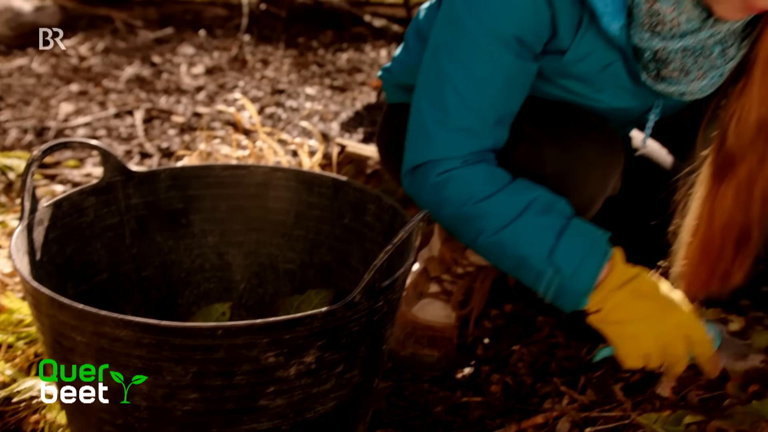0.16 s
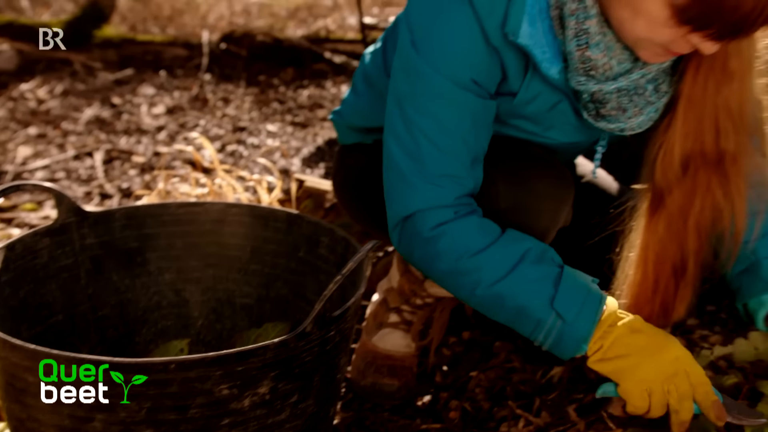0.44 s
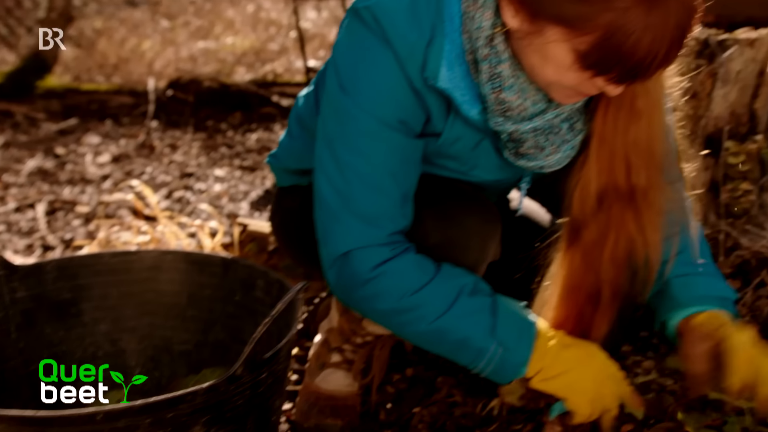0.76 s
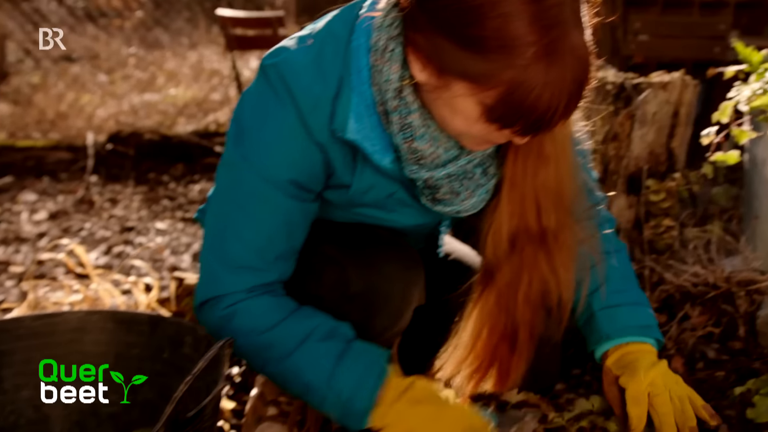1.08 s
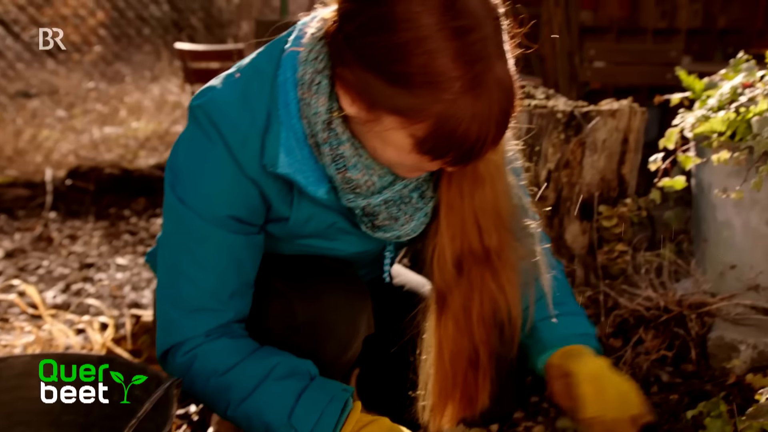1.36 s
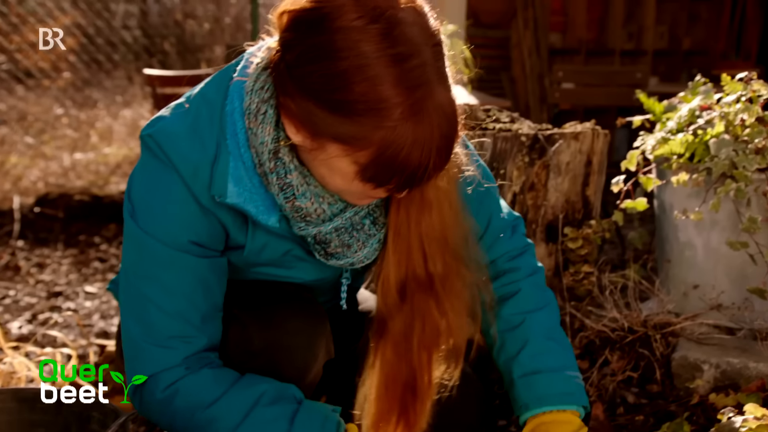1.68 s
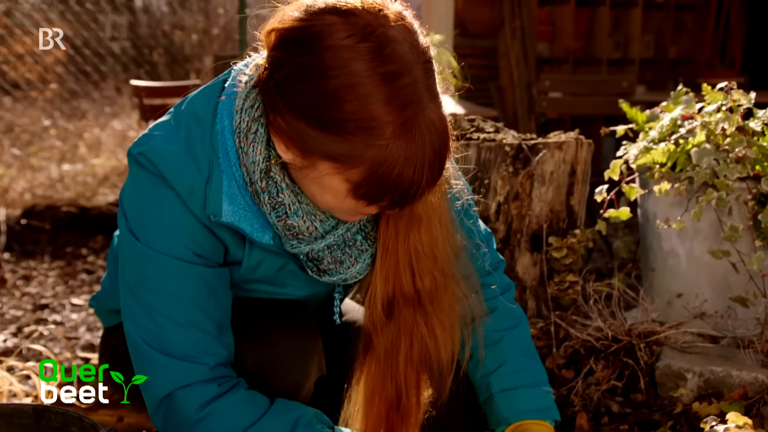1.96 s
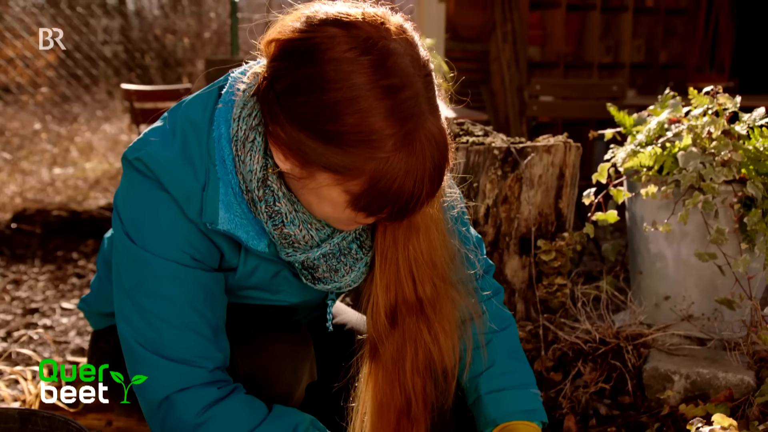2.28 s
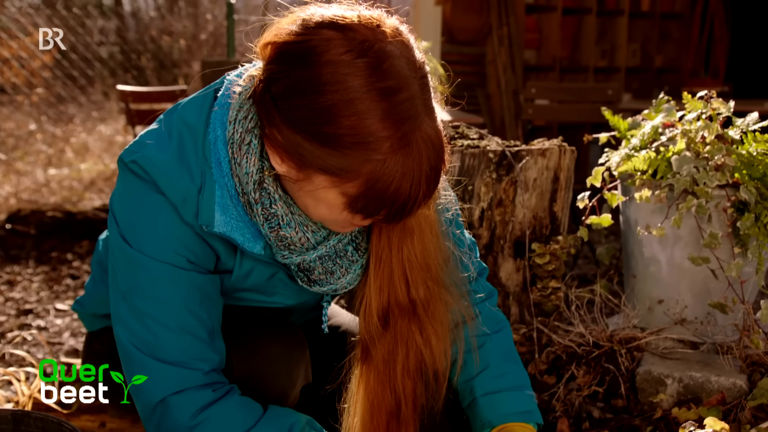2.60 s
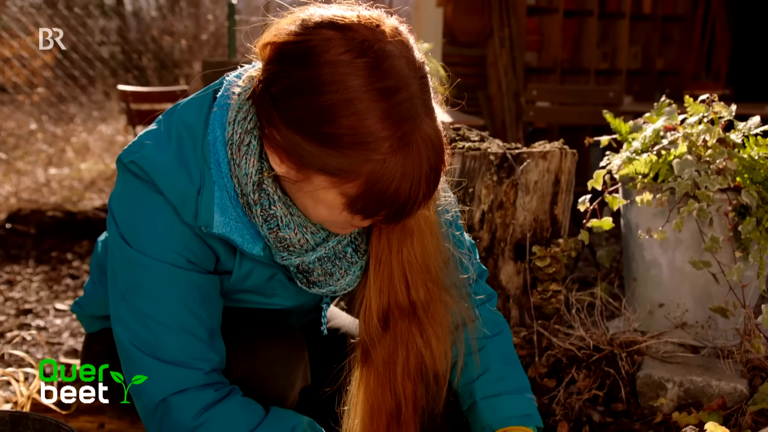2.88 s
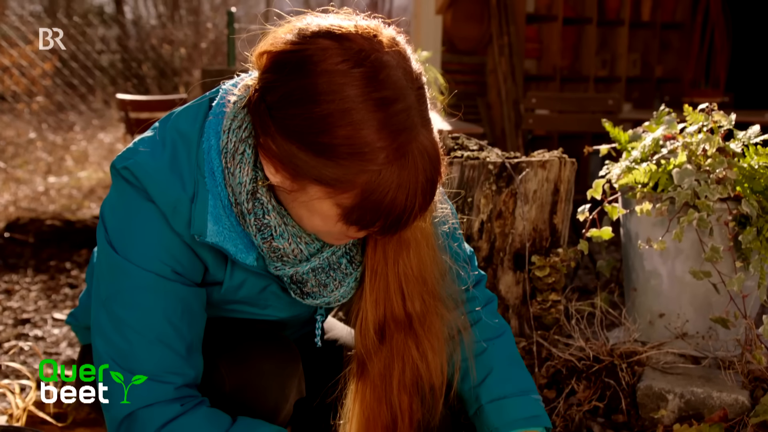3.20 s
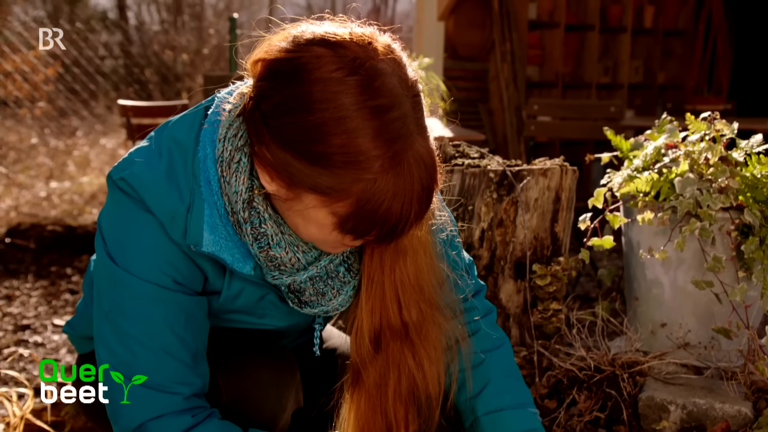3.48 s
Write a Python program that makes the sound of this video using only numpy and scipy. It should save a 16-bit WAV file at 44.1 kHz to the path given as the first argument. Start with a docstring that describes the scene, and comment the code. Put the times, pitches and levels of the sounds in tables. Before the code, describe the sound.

Dry leaves rustle and crinkle under gloved hands, with small snaps and one shear snip.

```python
"""A garden bed, the microphone close to gloved hands rummaging through dry, leathery leaves.
For two seconds the leaves slide and crinkle in several strokes, while stalks tick and snap.
The hands go quieter; at three seconds the shears bite through one stem and the rustling picks up.
A low outdoor rumble and a faint hiss lie behind it throughout."""
import sys
import numpy as np
from scipy import signal
from scipy.fft import rfft, irfft, next_fast_len
from scipy.io import wavfile

SR = 44100
rng = np.random.default_rng(int(sys.argv[2]) if len(sys.argv) > 2 else 0)


def store_pcm(level_fs):
    """Save levels as 16-bit WAV."""
    pcm = np.round(np.clip(level_fs, -1, 1) * 32767).astype(np.int16)
    wavfile.write(sys.argv[1], SR, np.atleast_2d(pcm).T)


N = 160965
BAND_EDGE_HZ = 14400

# Stereo width of the treble hiss: f/Hz, gain of the side signal/dB
WIDTH = [(2500, -65), (3800, -44), (5000, -14.5), (8000, -3), (14000, -4)]


def rustle():
    """Close up, leaves crinkle and slide over the duller rub of gloves and stalks; gives middle, side."""
    # Strokes of the hands in the foliage: t/s, leaf level/dB, rubbing level/dB
    strokes = [(0, -70, -50.5), (.07, -61.5, -61.5), (.12, -52.5, -55), (.18, -43, -55.5), (.235, -48, -51),
               (.285, -49, -63), (.38, -45, -56.5), (.42, -51, -54), (.452, -46.5, -49.5),
               (.475, -57, -59.5), (.52, -57, -57.5), (.565, -49.5, -59), (.635, -55.5, -57),
               (.67, -46, -49.5), (.73, -55.5, -59), (.80, -49, -60), (.835, -58.5, -62), (.88, -52.5, -61),
               (.94, -57, -59), (.985, -43, -51.5), (1.03, -48.5, -57), (1.09, -50.5, -54),
               (1.16, -43.5, -54), (1.19, -53, -57), (1.25, -53.5, -53), (1.335, -56.5, -62),
               (1.405, -56, -63), (1.43, -69, -89), (1.55, -71, -70), (1.587, -64, -59),
               (1.605, -50, -51.5), (1.69, -53.5, -58.5), (1.80, -50.5, -58), (1.88, -57, -57.5),
               (1.97, -57, -64), (2.0, -65.5, -65.5), (2.14, -66, -69), (2.24, -63.5, -72),
               (2.37, -65.5, -74), (2.42, -59, -66), (2.53, -67.5, -68), (2.61, -68, -76),
               (2.66, -73, -66.5), (2.70, -61.5, -68), (2.79, -76, -85), (2.92, -68, -81), (2.97, -55, -66),
               (3.02, -57.5, -69), (3.075, -54.5, -57), (3.16, -53, -67), (3.215, -52, -57),
               (3.27, -54, -64), (3.34, -53.5, -59), (3.365, -51, -60), (3.39, -52, -63.5),
               (3.438, -49, -57.5), (3.47, -66, -80), (3.53, -58.5, -64.5), (3.65, -61, -70)]
    # Spectrum of the dry leaves: f/Hz, relative level/dB
    leaf_colour = [(150, -10.5), (400, -5), (900, -1.5), (1800, 0), (3000, 1.5), (4500, 1), (6500, -0.5),
                   (8500, -3.5), (11000, -5.5), (14500, -10.5)]
    # Spectrum of gloves and stalks rubbing: f/Hz, relative level/dB
    rub_colour = [(60, -24), (150, -9), (300, 0.5), (600, -1.5), (1000, 0.5), (1400, 0), (2200, -12),
                  (5000, -17), (12000, -33)]
    t = np.arange(N) / SR
    stroke_s, leaf_db, rub_db = np.transpose(strokes)
    leaf_gain = amp(np.interp(t, stroke_s, leaf_db))
    rub_gain = amp(np.interp(t, stroke_s, rub_db))
    catch = catching()
    crinkling = amp(-2.5) * crinkles()
    sliding = amp(-2) * rng.standard_normal(N)
    leaves = leaf_gain * catch * unit_rms(coloured(crinkling + sliding, leaf_colour))
    rub = rub_gain * catch * unit_rms(coloured(crinkles(), rub_colour))
    side_noise = unit_rms(coloured(rng.standard_normal(N), leaf_colour))
    return leaves + rub, leaf_gain * coloured(side_noise, WIDTH)


def crinkles(patches=32, per_s=2600, spread_db=4, decay_s=.0005):
    """Tiny buckles of uneven size, each ringing one of many patches of leaf for an instant."""
    size_db = spread_db * np.minimum(rng.exponential(1, N), 4.17)
    sizes = amp(size_db) * rng.choice([-1, 1], N)
    clicks = sizes * (rng.random(N) < per_s / SR)
    patch = rng.integers(0, patches, N)
    t = np.arange(256) / SR
    rings = rng.standard_normal((patches, len(t))) * np.exp(-t / decay_s)
    out = np.zeros(N)
    for k, ring in enumerate(rings):
        out += signal.oaconvolve(clicks * (patch == k), unit_rms(ring))[:N]
    return unit_rms(out)


def catching(grip_s=.009, depth_db=2.2):
    """The leaves catch and let go: a gain with quick random swells."""
    window = np.hanning(int(2 * grip_s * SR))
    swell = unit_rms(signal.oaconvolve(rng.standard_normal(N), window, "same"))
    return unit_rms(amp(depth_db * swell))


def snaps(peak_db=8, peak_octaves=.31):
    """Each stalk or leaf rib breaks with a resonance of its own."""
    # Stalks and ribs breaking: t/s, level/dB, decay/s, resonance f/Hz, tilt/(dB per octave)
    breaks = [(0.2285, -38, .002, 5000, -2), (0.2486, -35, 0.0006, 7000, 2), (.262, -39.5, 0.0013, 4520, 1),
              (.3897, -41, 0.00054, 4000, -3), (.4475, -43, .002, 4500, 6), (.528, -44.5, .002, 6000, 0),
              (.551, -40, 0.00075, 4800, -3.5), (.6155, -44, 0.0011, 3500, 3),
              (.653, -38.5, 0.0014, 4950, -1), (.692, -42, .0007, 4500, -2),
              (0.76, -41.5, 0.0024, 1300, -4.5), (.844, -47, .002, 4970, 1),
              (0.8944, -45, 0.0023, 2600, -5), (.9605, -43.5, 0.0027, 4000, -5),
              (.982, -36.5, 0.0027, 3500, 3.5), (0.9851, -31.5, 0.0025, 2480, 0),
              (1.017, -41.5, .0006, 6200, 1), (1.099, -35, .002, 6300, 2.5),
              (1.1604, -34.5, .0015, 6400, 1.5), (1.1662, -35.5, 0.0015, 2190, -1.5),
              (1.173, -39.5, 0.0014, 3000, 1), (1.1956, -37, .005, 1000, -2.5),
              (1.315, -45.5, 0.0045, 1500, 1), (1.3645, -44, 0.0018, 4000, 6), (1.391, -44, .005, 1300, -4),
              (1.568, -53.5, 0.0044, 3300, -1), (1.602, -41.5, .0014, 4500, -3),
              (1.62, -41, .002, 1200, -0.5), (1.806, -38, 0.0023, 6000, 0.5), (1.9407, -51, .003, 4500, 2),
              (1.981, -42.5, .0025, 6600, 1), (2.1885, -36.5, 0.0016, 6960, 0.5),
              (2.196, -47.5, .003, 6000, 1), (2.2435, -47, .006, 6000, -1), (2.2818, -47, .0007, 3000, -1),
              (2.284, -45.5, .006, 5000, -1), (2.318, -44.5, 0.0057, 5200, -1.5),
              (2.436, -43.5, 0.0035, 5500, 2), (2.494, -44, 0.0014, 9600, 1.5),
              (2.599, -52.5, 0.0018, 5000, -3), (2.6388, -36, .001, 5240, 2.5),
              (2.649, -45.5, .009, 5600, 5), (2.8391, -50.5, .0012, 2900, 0),
              (2.869, -50.5, .0008, 4500, -4.5), (2.8755, -58, .001, 5000, 0),
              (2.891, -41.5, 0.00074, 5200, -2.5), (2.9685, -41, .0012, 6000, 2),
              (2.9765, -45.5, .0015, 5600, -1.5), (2.99, -49, .002, 6000, 3),
              (3.0715, -46.5, .002, 4500, -4.5), (3.108, -46, .0012, 7000, 1),
              (3.2115, -41.5, 0.0047, 3180, -2), (3.3565, -38.5, 0.0023, 7500, 1.5),
              (3.588, -50, .001, 6000, 6), (3.6048, -51, .002, 1590, -3)]
    # Spectrum common to all snaps: f/Hz, relative level/dB
    stalk_colour = [(100, -15), (400, -4.5), (1200, -1), (3000, 0.5), (6000, -0.5), (9000, -4),
                    (14500, -7.5)]
    out, hz = np.zeros(N), np.fft.rfftfreq(2048, 1 / SR)
    for start_s, level_db, decay_s, ring_hz, tilt_db in breaks:
        octaves = np.log2((hz + 20) / ring_hz)
        resonance_db = peak_db * np.exp(-(octaves / peak_octaves) ** 2)
        colour_db = spectrum_db(stalk_colour, hz) + tilt_db * octaves + resonance_db
        add(out, start_s, fracture(level_db, decay_s, colour_db, rise_s=.0002))
    return out


def shears_cut(broadband_db=-10.5):
    """The stem breaks in stages between the blades, ringing stem and shears."""
    # Skin splits, fibres give, the core breaks: t/s, level/dB, decay/s, tilt/(dB per octave)
    stages = [(3.0377, -33.5, 0.0013, 6), (3.0426, -27.5, 0.00084, -3.5), (3.0438, -19.5, 0.00035, 2.5),
              (3.0446, -31.5, 0.0015, 1)]
    # Resonances of stem and shears: f/Hz, width/Hz, relative level/dB
    resonances = [(770, 440, 0.5), (1870, 610, 3.5), (2600, 440, -3), (4360, 700, 0), (5200, 650, 5),
                  (6080, 630, 1), (6900, 500, -4.5), (7700, 500, -7), (11200, 1500, -21),
                  (13600, 1200, -23)]
    out, hz = np.zeros(N), np.fft.rfftfreq(2048, 1 / SR)
    power = amp(broadband_db) ** 2 / (1 + (hz / BAND_EDGE_HZ) ** 8)
    for ring_hz, width_hz, ring_db in resonances:
        power += amp(ring_db) ** 2 / (1 + (2 * (hz - ring_hz) / width_hz) ** 2) ** 2
    for start_s, level_db, decay_s, tilt_db in stages:
        colour_db = 10 * np.log10(power) + tilt_db * np.log2(1 + hz / 1000)
        add(out, start_s, fracture(level_db, decay_s, colour_db, rise_s=.00005))
    return out


def fracture(level_db, decay_s, colour_db, rise_s):
    """A quickly dying volley of tiny breaks rings a body; the level is its energy spread over 2 ms."""
    t = np.arange(2 * (len(colour_db) - 1)) / SR
    volley = rng.standard_normal(len(t)) * np.exp(-t / decay_s) * (1 - np.exp(-t / rise_s))
    log_gain = np.log(amp(np.r_[colour_db, colour_db[-2:0:-1]]))
    # Minimum phase: the body rings only after it is struck
    body = np.exp(np.conj(signal.hilbert(log_gain)))[:len(colour_db)]
    sound = irfft(rfft(volley) * body)
    return amp(level_db) * sound / np.linalg.norm(sound) * np.sqrt(.002 * SR)


def reflections(x, level_db=-14, t60_s=.052):
    """Brief, faint returns from the nearby soil, plants and kneeling body."""
    t = np.arange(SR // 4) / SR
    tail = rng.standard_normal(len(t)) * amp(-60 * t / t60_s) * (t > .002)
    return amp(level_db) * signal.oaconvolve(x, tail / np.linalg.norm(tail))[:N]


def outdoor_air(level_db=-53):
    """Low outdoor rumble and a faint hiss in the background; gives middle, side."""
    # Spectrum of the outdoor background: f/Hz, relative level/dB
    air_colour = [(8, -21), (14, -7), (19, 6.5), (27, -3), (40, -4), (57, 2), (75, -6.5), (105, -8),
                  (140, -13.5), (190, -20), (400, -23), (1000, -29.5), (2500, -38), (6000, -45.5),
                  (14000, -50)]
    noises = rng.standard_normal((2, N))
    middle, side = (amp(level_db) * unit_rms(coloured(noise, air_colour)) for noise in noises)
    return middle, coloured(side, WIDTH)


def amp(db):
    """Decibels to gain."""
    return 10 ** (np.asarray(db) / 20)


def unit_rms(x):
    """Scales to rms 1."""
    return x / np.sqrt(np.mean(x ** 2) + 1e-20)


def spectrum_db(points, hz):
    """Reads a spectrum table on a log-frequency axis."""
    f, db = np.transpose(points)
    return np.interp(np.log(hz + 1), np.log(f + 1), db)


def coloured(x, points):
    """Filters by a spectrum table."""
    size = next_fast_len(len(x))
    gain = amp(spectrum_db(points, np.fft.rfftfreq(size, 1 / SR)))
    return irfft(rfft(x, size) * gain, size)[:len(x)]


def add(mix, start_s, sound):
    """Mixes a sound in at a time."""
    part = mix[round(start_s * SR):][:len(sound)]
    part += sound[:len(part)]


def scene():
    """Everything sits centred; a wide hiss above about 4 kHz swells with the rustling."""
    leaves, swelling_hiss = rustle()
    air, steady_hiss = outdoor_air()
    breaks = snaps() + shears_cut()
    middle = leaves + breaks + reflections(breaks) + air
    side = swelling_hiss + steady_hiss
    return np.array([middle + side, middle - side])


def record(dry):
    """The recorder cuts off the highest treble."""
    lowpass = signal.firwin(301, BAND_EDGE_HZ, window=("kaiser", 8), fs=SR)
    return signal.oaconvolve(dry, lowpass[None], "same")


dry = scene()
out = record(dry)
store_pcm(out)
```